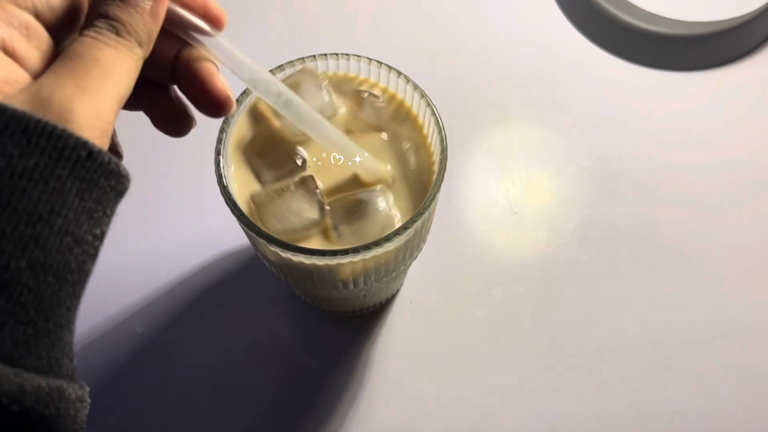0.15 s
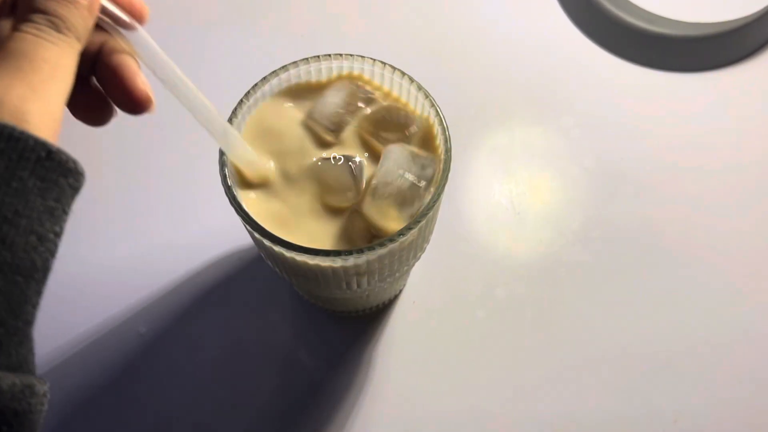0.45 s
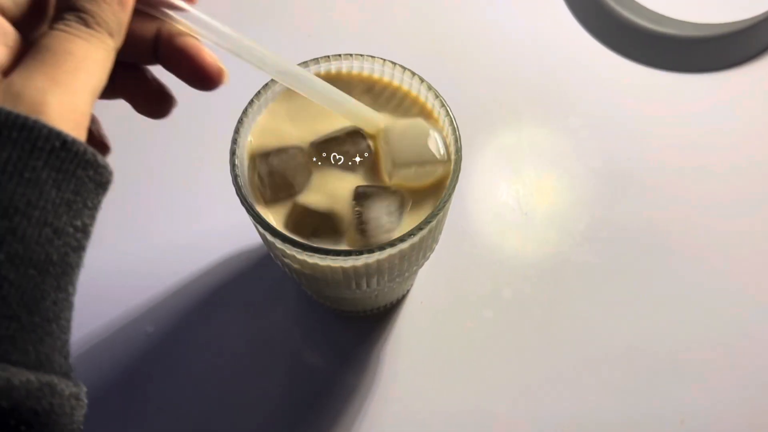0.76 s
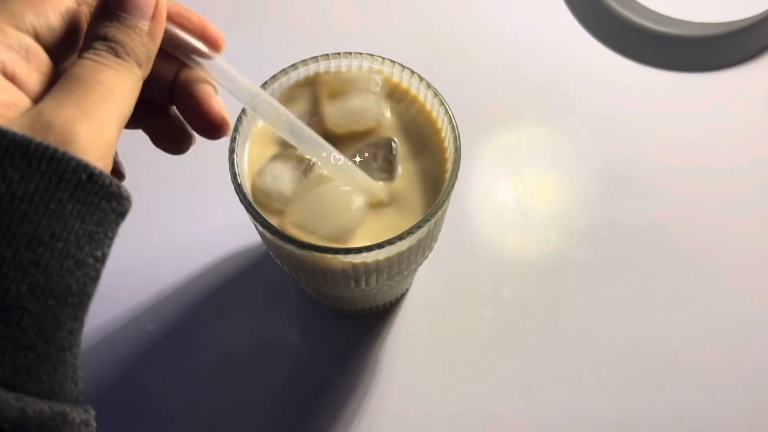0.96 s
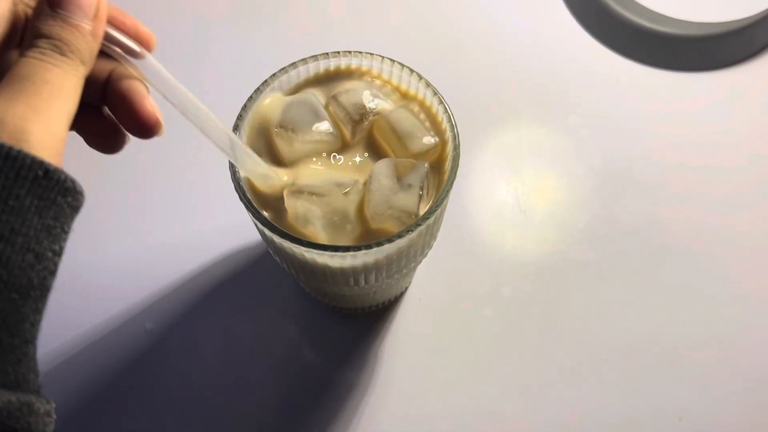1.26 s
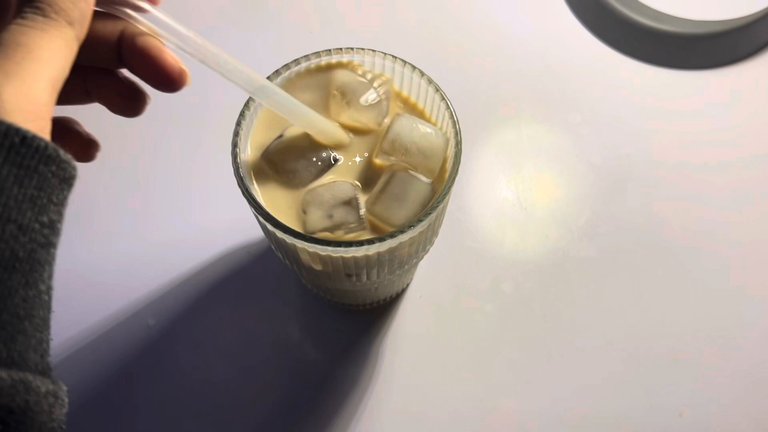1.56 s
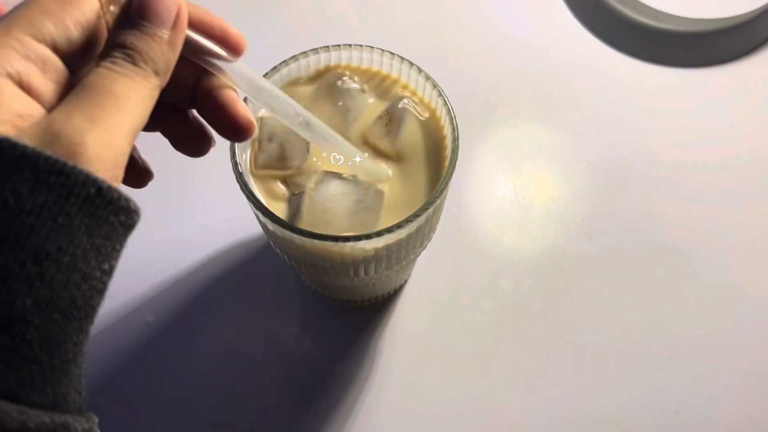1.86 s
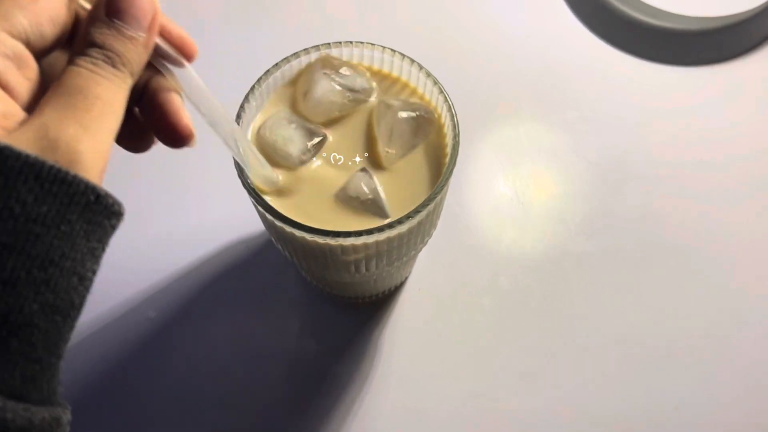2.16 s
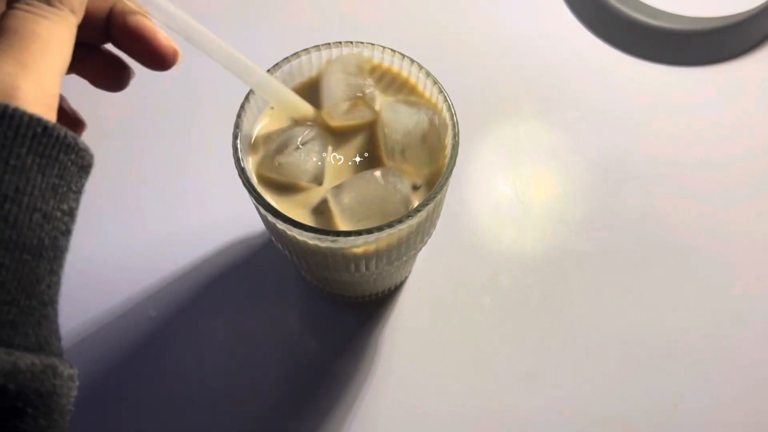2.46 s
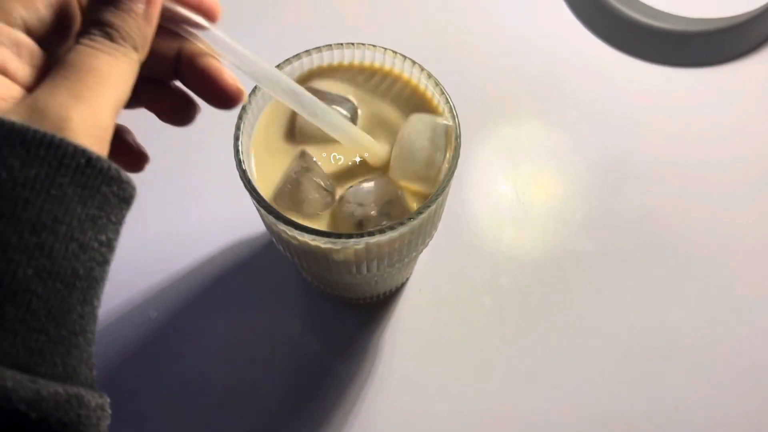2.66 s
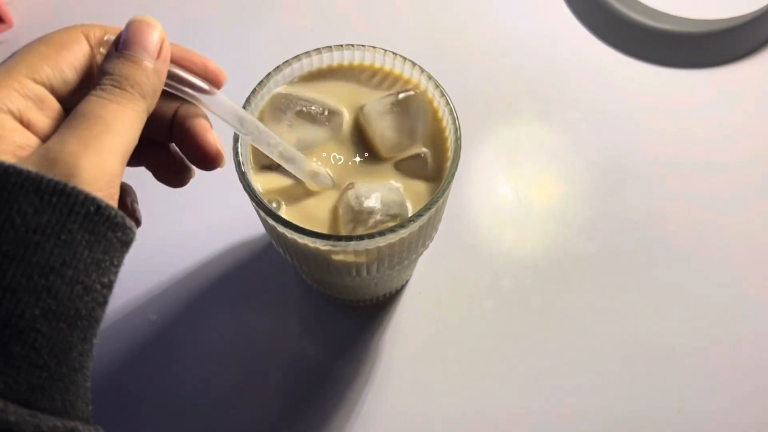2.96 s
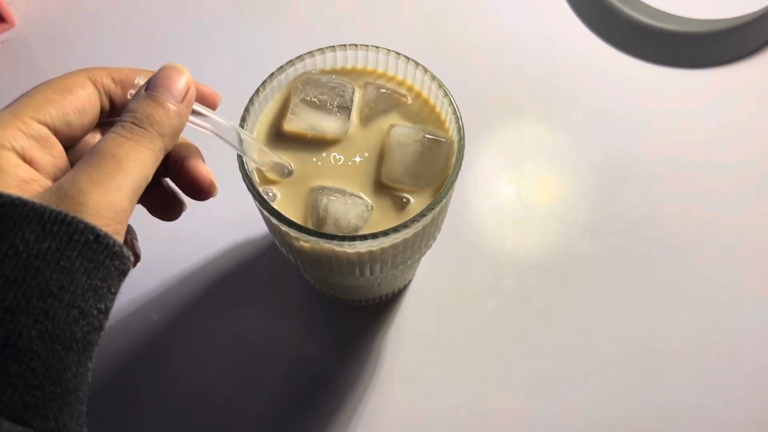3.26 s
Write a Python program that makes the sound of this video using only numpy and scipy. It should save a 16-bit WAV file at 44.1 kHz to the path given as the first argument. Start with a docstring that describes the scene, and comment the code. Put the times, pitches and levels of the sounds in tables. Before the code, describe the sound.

Continuous stirring of an iced drink: short bright clinks and light ticks over a faint rubbing hum and liquid swish, strongest around one second, heard close up in a small, fairly dry room.

```python
"""A glass straw stirs ice cubes in a thick ribbed tumbler on a desk, close to a phone with two ports.
Each knock rings damped wall modes and one short ping, with bursts of band noise, and lands twice.
Ticks are lighter blows, some placed and many random; noise through resonators makes the rubbing wall and desk hum.
Shoves boom in the desk; shaped noise is the swish and the air, and a diffuse tail is the room's answer."""
import sys
import numpy as np
from scipy import signal
from scipy.fft import rfft, irfft
from scipy.io import wavfile
from scipy.ndimage import uniform_filter1d, map_coordinates

SR = 44100
rng = np.random.default_rng(int(sys.argv[2]) if len(sys.argv) > 2 else 0)


def unload_audio(sound):
    """Save the sound as a 16-bit wav file, at the path given as the first command line argument."""
    columns = np.transpose(np.atleast_2d(sound))
    # keep every value between -1 and 1, then stretch to whole-number steps
    steps = np.round(np.clip(columns, -1, 1) * 32767)
    wavfile.write(sys.argv[1], SR, steps.astype(np.int16))


N = 149940

# stirring strength: t/s, level/dB
STIR = [(0, -52), (.1, -66.5), (.22, -59), (.6, -56.5), (.8, -60.5), (.95, -49.5), (1.13, -67.5),
        (1.2, -57), (1.6, -57), (1.8, -62), (1.9, -58.5), (2.09, -66.5), (2.14, -54.5), (2.29, -67),
        (2.4, -59.5), (2.58, -62), (2.8, -56), (3.12, -60), (3.2, -70), (3.4, -80)]
# wall modes of the tumbler: f/Hz, level over its band/dB, free t60/s
WALL_MODES = [(482, -10, 0.017), (1175, -7, 0.13), (2983, -4.5, 0.076), (3102, 1, 0.018), (4710, -16, 0.05),
              (5490, -11.5, 0.036), (8750, 5, 0.0051)]
# bands, in order clink, wall hum, ring, tick, top: low edge f/Hz, high edge f/Hz
BANDS = [(3700, 6200), (350, 1500), (2100, 3700), (6200, 11800), (11800, 17000)]


def undb(db):
    """Decibels to amplitude gain."""
    return 10 ** (np.asarray(db) / 20)


def unit(x):
    """Scale to an RMS of 1."""
    return x / np.sqrt(np.mean(x ** 2))


def stirring():
    """The stirring strength as gain over time."""
    t, db = np.array(STIR).T
    return undb(np.interp(np.arange(N) / SR, t, db))


def walk(rate):
    """Random levels, one every 1 / rate s, joined by slopes; RMS 1."""
    hold = int(SR / rate)
    steps = np.repeat(rng.standard_normal(N // hold + 1), hold)
    return unit(uniform_filter1d(steps, hold)[:N])


def coloured(spectrum, channels):
    """Noise shaped by a table of f/Hz, relative level/dB, read along log frequency; RMS 1."""
    hz, db = np.array(spectrum).T
    f = np.fft.rfftfreq(N, 1 / SR) + 1  # 1 Hz up, to keep the log finite
    gain = undb(np.interp(np.log(f), np.log(hz), db))
    return unit(irfft(rfft(rng.standard_normal((channels, N))) * gain, N))


def band_of(hz):
    """Index of the band that holds a wall mode."""
    return [low <= hz < high for low, high in BANDS].index(True)


def resonate(push, hz, t60):
    """One decaying mode driven by a force: a complex one-pole resonator."""
    pole = np.exp(2j * np.pi * hz / SR - np.log(1000) / (t60 * SR))
    return signal.lfilter([1], [1, -pole], push).imag


def room_air():
    """Steady shaped noise, mostly common to both ports with a small opposed part."""
    # air spectrum: f/Hz, relative level/dB
    air_spectrum = [(22, -42.5), (55, 0), (130, 10.5), (200, -1.5), (300, -41), (1300, -9), (2100, -23),
                    (5000, -62)]
    air = coloured(air_spectrum, channels=2)
    common = air.sum(0)
    opposed = air - air[::-1]
    return (common + 0.21 * opposed) * undb(-65)


def room(x):
    """A short diffuse tail: decaying band-limited noise, different at each port."""
    level_db, t60_s, low_hz, top_hz = -16, 0.14, 300, 7000
    t = np.arange(SR // 3) / SR
    fall = np.exp(-np.log(1000) * t / t60_s)
    tail = rng.standard_normal((2, len(t))) * fall * (t > .003)  # silent for the first 3 ms
    tail = signal.sosfilt(signal.butter(1, [low_hz, top_hz], "band", fs=SR, output="sos"), tail)
    tail = tail / np.sqrt(np.sum(tail ** 2) / 2)
    return undb(level_db) * signal.fftconvolve(x[None], tail)[:, :N]


def liquid_swish():
    """Liquid swishes as shaped noise that follows the stirring and flickers in level."""
    # swish spectrum: f/Hz, relative level/dB
    swish_spectrum = [(250, -13), (500, 7), (1170, 20), (1930, 12), (4610, -5.5), (8730, -37.5),
                      (16500, -18)]
    level_db, flicker_db = -4.5, 6  # over the stirring level; RMS of the flicker
    noise = coloured(swish_spectrum, channels=2)
    return noise * stirring() * undb(level_db + flicker_db * walk(140))


def desk():
    """The turning ice drags and shoves the glass; the low modes of the desk hum unevenly and boom."""
    # low modes of the desk: f/Hz, hum level over the stirring/dB, t60/s
    desk_modes = [(108.5, -5.5, 0.29), (203.9, 8, 0.11), (377.5, -4.5, 0.075)]
    # soft shoves of the glass: t/s, then the peak level/dB in each of the three desk modes
    thuds = np.array([(0.405, -32, -30.5, -46), (0.497, -44, -36, -41), (0.872, -40, -31, -43),
                      (.97, -38.5, -39, -50.5), (1.169, -33.5, -34.5, -41), (1.568, -73, -32, -42.5),
                      (1.714, -64, -35.5, -50.5), (2.119, -56, -36.5, -38.5), (2.324, -57, -36.5, -52),
                      (2.6, -44.5, -63, -45), (2.794, -43, -41, -39.5)])
    thud_rise_s, unevenness_db = 0.0074, 5.3
    soft = np.hanning(int(2 * thud_rise_s * SR))
    soft_t = np.arange(len(soft)) / SR
    strength = stirring()
    out = 0
    for k, (hz, db, t60) in enumerate(desk_modes):
        shove = np.zeros(N)
        shove[(thuds[:, 0] * SR).astype(int)] = undb(thuds[:, k + 1])
        # a soft push tuned to the mode, so that the boom swells in
        push = 2 * soft / soft.sum() * np.cos(2 * np.pi * hz * soft_t)
        boom = resonate(np.convolve(shove, push)[:N], hz, t60)
        drag = rng.standard_normal(N) * undb(unevenness_db * np.tanh(walk(20)))
        hum = undb(db) * strength * unit(resonate(drag, hz, t60))
        out = out + boom + hum
    return out


def rub():
    """Straw and ice slide along the wall and keep its lower modes singing, with a gently wandering pitch."""
    # level of the singing modes over the stirring in the first three bands: level/dB
    rub_db = [-3.5, 6, -5.5]
    damp, unevenness_db = 0.42, 8.8  # share of the free t60 left under contact; limit of the level swing
    drift_s = .004  # time wander, before it is smoothed
    out = 0
    for hz, db, t60 in WALL_MODES[:-1]:
        push = rng.standard_normal(N) * undb(unevenness_db * np.tanh(walk(35)))
        singing = unit(resonate(push, hz, damp * t60))
        out = out + undb(db + rub_db[band_of(hz)]) * singing
    # reading the sound slightly early or late bends the pitch
    wander = uniform_filter1d(walk(8), SR // 10) * drift_s * SR
    return map_coordinates(out, [np.arange(N) + wander], mode="mirror") * stirring()


def strike(times, band_db, ping_hz, seconds):
    """Each blow rings slightly detuned wall modes and its own ping, adds contact noise and bounces once."""
    # contact noise of each band: level over the band/dB
    crack_db = [-2.5, 5.5, 4.5, 9, 5]
    # contact noise of each band: t60/s
    crack_t60 = [0.012, 0.026, 0.018, 0.0069, 0.014]
    detune, mode_scatter_db = 0.012, 3  # RMS from blow to blow, detune as a share of f
    rise_s, bounce_s, bounce_db = .0011, .0035, -15  # bounce: typical gap and level
    ping_db, ping_t60_s = 1, 0.016  # the short ping of the struck cube, over the clink band
    hz, mode_db, mode_t60 = np.array(WALL_MODES).T
    band = [band_of(f) for f in hz]
    t = np.arange(int(seconds * SR)) / SR

    def envelopes(t60):
        """One quick rise and exponential fall for each t60."""
        fall = np.exp(-np.log(1000) * t / np.array(t60)[:, None])
        return fall * np.minimum(t / rise_s, 1)

    chance = rng.standard_normal((len(times), 3, len(hz)))
    crack = []
    for edges in BANDS:
        sos = signal.butter(3, edges, "band", fs=SR, output="sos")
        crack.append(unit(signal.sosfilt(sos, rng.standard_normal(N + SR))))
    crack = np.array(crack)
    mode_env, crack_env = envelopes(mode_t60), envelopes(crack_t60)
    ping_env = envelopes([ping_t60_s])[0]
    out = np.zeros(N + SR)
    for s, level, pitch, (tune, size, bounce) in zip(times, band_db, ping_hz, chance):
        tuned_hz = hz * (1 + detune * tune)
        modes = np.sin(2 * np.pi * tuned_hz[:, None] * t) * mode_env
        ring = undb(level[band] + mode_db + mode_scatter_db * size) @ modes
        ping = undb(level[0] + ping_db) * ping_env * np.sin(2 * np.pi * pitch * t)
        first = int(s * SR)
        second = first + int(bounce_s * SR * undb(3 * bounce[0]))
        second_gain = undb(bounce_db + 2 * bounce[1])
        for start, gain in (first, 1), (second, second_gain):
            grit = undb(level + crack_db) @ (crack[:, start:start + len(t)] * crack_env)
            out[start:start + len(t)] += gain * (ring + ping + grit)
    return out[:N]


def rattle():
    """Ticks of ice on ice and straw on ribs: clear ones, and faint random ones that cluster with the stirring."""
    # clear light ticks: t/s, level/dB, ping f/Hz
    clear_ticks = [(0.2555, -35, 5300), (0.3267, -35, 4720), (0.466, -38, 2960), (0.6569, -40, 4850),
                   (0.6949, -28, 5040), (0.8834, -24, 5150), (0.954, -29, 4560), (1.0533, -36.5, 4480),
                   (1.1302, -34.5, 2780), (1.1842, -29.5, 4700), (1.23, -34, 4660), (1.2735, -33.5, 4790),
                   (1.3448, -28.5, 4660), (1.4092, -43.5, 3080), (1.491, -39, 4680), (1.6152, -29, 3120),
                   (1.7111, -32, 3000), (1.7271, -35, 4830), (1.8443, -34.5, 4780), (1.945, -38.5, 4450),
                   (1.9933, -35, 4420), (2.157, -33.5, 4460), (2.2494, -52, 3030), (2.3509, -33, 4580),
                   (2.3836, -41, 4930), (2.4343, -36, 2930), (2.5122, -32, 4610), (2.752, -31.5, 5560),
                   (2.8564, -34.5, 2870), (2.9311, -41.5, 4600), (2.9411, -36, 5660), (3.0413, -35.5, 4650),
                   (3.0954, -41, 4590)]
    # balance of a tick, over the level of the tick in each band: level/dB
    tick_db = np.array([-2, -17, -14, -19, -37])
    rate_per_s, spread_db, cluster_db = 150, 3, 5.5
    faint_db = 4  # faint ticks over the stirring level
    draw = rng.random((int(rate_per_s * N / SR), 8))
    times = draw[:, 0] * (N - 1) / SR
    size_db = -spread_db * np.log(1 - .9 * draw[:, 1])  # many small ticks, few large
    size_db = size_db + np.interp(times, *np.array(STIR).T)
    size_db = size_db + cluster_db * np.tanh(walk(15))[(times * SR).astype(int)]
    colour_db = 11 * (draw[:, 2:7] - .5)  # each band varies by up to 5.5 dB either way
    ping_hz = np.interp(draw[:, 7], [0, 1], (4340, 5460))
    faint = strike(times, size_db[:, None] + faint_db + tick_db + colour_db, ping_hz, seconds=0.11)
    s, db, hz = np.array(clear_ticks).T
    clear = strike(s, db[:, None] + tick_db, hz, seconds=0.078)
    return faint + clear


def knocks():
    """Ice and straw knock on the wall and set off its damped clinks."""
    # t/s, level/dB of clink near 5 kHz, wall hum near 1.2 kHz, ring near 3 kHz, tick near 9 kHz,
    # top near 15 kHz, then ping f/Hz
    knock_table = np.array([(0.2095, -21.5, -44.5, -40.5, -26, -53, 4710),
                            (0.2236, -32, -39.5, -44.5, -43, -68, 5400),
                            (0.396, -27.5, -41.5, -38.5, -37, -48, 4810),
                            (0.5461, -24.5, -45.5, -43, -45, -55, 5190),
                            (0.5665, -34, -60, -39.5, -53, -57.5, 5400),
                            (0.5894, -25, -51, -39, -21, -34.5, 4320),
                            (0.6694, -31.5, -57, -45, -46, -53, 4880),
                            (0.7859, -37, -41.5, -42, -52, -71.5, 4740),
                            (0.8668, -23.5, -40, -35.5, -29.5, -43, 4510),
                            (0.9145, -29.5, -50, -41, -55, -53, 4670),
                            (0.9605, -18, -47, -36.5, -24.5, -44, 4570),
                            (0.9794, -27.5, -42, -36.5, -37.5, -54, 4680),
                            (1.1629, -22.5, -33, -35, -28, -46, 4123),
                            (1.24, -35, -57, -48, -41, -65, 4870), (1.3, -24.5, -50, -66, -39, -69, 4820),
                            (1.3283, -22, -61, -58, -39, -71, 4800),
                            (1.3362, -37, -43, -43.5, -57, -72, 4460),
                            (1.4307, -32.5, -47, -44, -43.5, -44, 5220),
                            (1.4489, -29.5, -59, -52, -43, -60, 4790),
                            (1.565, -18.5, -41.5, -30, -35.5, -50, 5550),
                            (1.6307, -24.5, -41, -36.5, -38.5, -61, 5600),
                            (1.797, -34.5, -49, -46.5, -42.5, -54, 4000),
                            (1.8712, -23, -47.5, -39, -36, -54, 4620),
                            (2.119, -28, -36, -36, -31, -51, 4600),
                            (2.3207, -31, -47.5, -45, -37.5, -56, 4740),
                            (2.395, -25.5, -63, -49, -40, -56, 4810),
                            (2.602, -29, -44.5, -43.5, -43.5, -41, 4550),
                            (2.694, -23, -44, -39.5, -27, -51, 4700),
                            (2.7217, -29, -46, -44.5, -46, -62, 4570),
                            (2.7916, -27, -63, -36.5, -34.5, -62, 4600),
                            (2.8165, -30, -45.5, -42, -51, -70, 4870),
                            (3.027, -31.5, -63, -55, -41.5, -75, 4760),
                            (3.1177, -29.5, -43.5, -43.5, -37.5, -51, 4390),
                            (3.2293, -37, -49, -42, -62, -100, 4650)])
    return strike(knock_table[:, 0], knock_table[:, 1:6], knock_table[:, 6], seconds=.2)


def ports(x):
    """Two ports hear the glass with a shared treble colour and their own level and phase."""
    # phase between the ports: f/Hz, lead of the left/rad
    port_phase = [(0, 0), (2760, 1.1), (4200, .1), (5680, -1.3), (7300, .1), (9600, -3.1), (12100, -6.5),
                  (13500, -9.4), (15100, -12.5)]
    # balance of the ports: f/Hz, left minus right level/dB
    port_balance = [(700, -.4), (2400, 3.5), (4400, 2.3), (8000, .1)]
    # colour shared by both ports: f/Hz, level/dB
    port_colour = [(6000, -4), (7800, 0.5), (9200, 9.5), (10500, -5.5), (12500, -13), (13600, 4),
                   (14800, 10), (16500, -8.5)]
    f = np.fft.rfftfreq(N, 1 / SR)
    balance_db = np.interp(f, *np.array(port_balance).T)
    lead = np.interp(f, *np.array(port_phase).T)
    colour = undb(np.interp(f, *np.array(port_colour).T))
    half = undb(balance_db / 2) * np.exp(.5j * lead)  # each port takes half the difference
    return irfft(rfft(x) * colour * np.array([half, 1 / half]), N)


def scene():
    """The glass and desk reach the ports directly and through the room; swish and air join them."""
    glass = knocks() + rattle() + rub() + desk()
    swish = liquid_swish()
    air = room_air()
    return ports(glass) + room(glass) + swish + air


def record(dry):
    """The phone cuts the top with a steep low-pass."""
    top_hz = 16650
    return signal.sosfilt(signal.ellip(10, .2, 80, top_hz, fs=SR, output="sos"), dry)


dry = scene()
out = record(dry)
unload_audio(out)
```